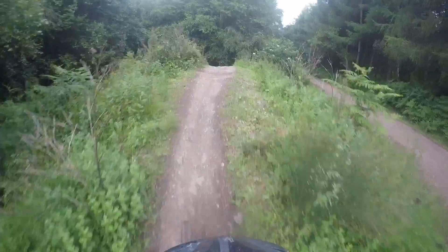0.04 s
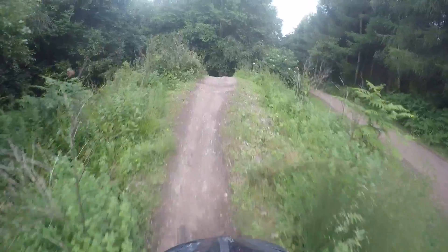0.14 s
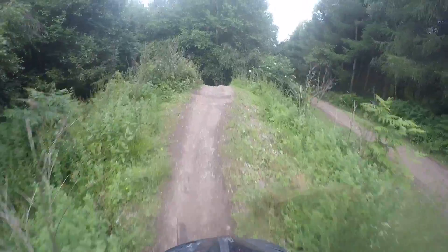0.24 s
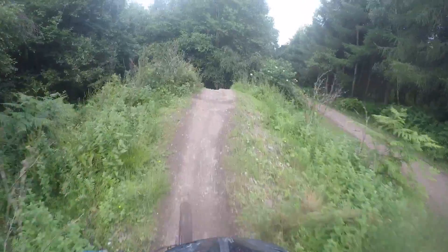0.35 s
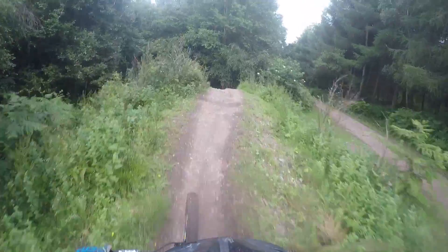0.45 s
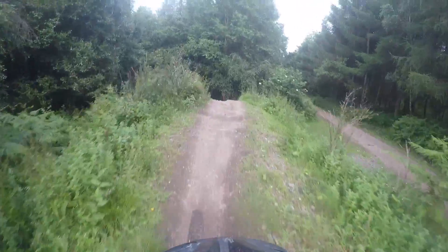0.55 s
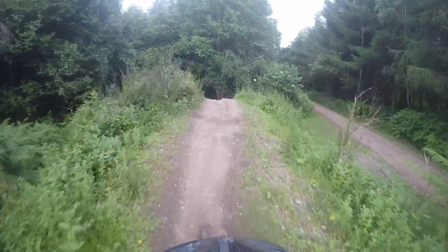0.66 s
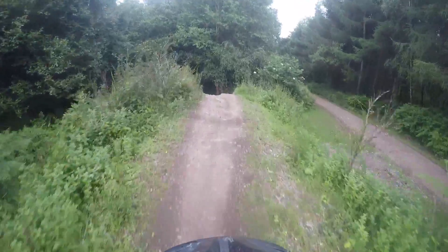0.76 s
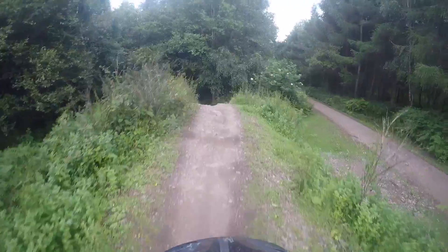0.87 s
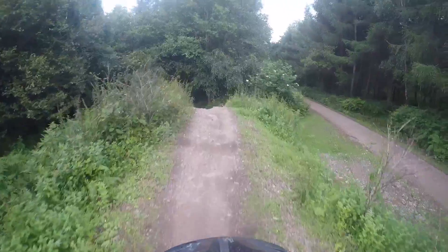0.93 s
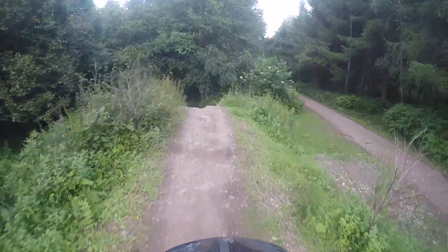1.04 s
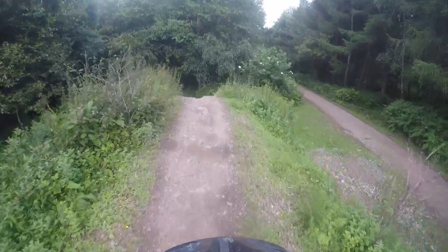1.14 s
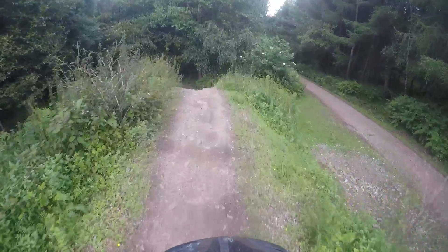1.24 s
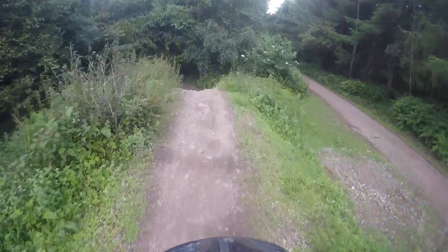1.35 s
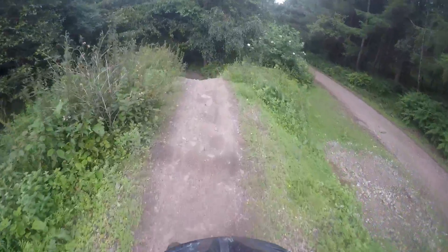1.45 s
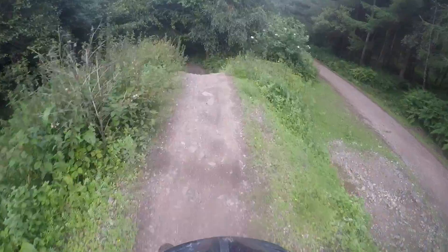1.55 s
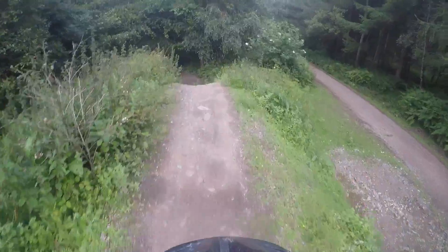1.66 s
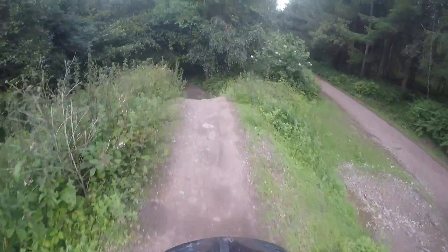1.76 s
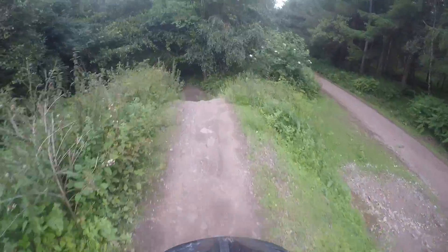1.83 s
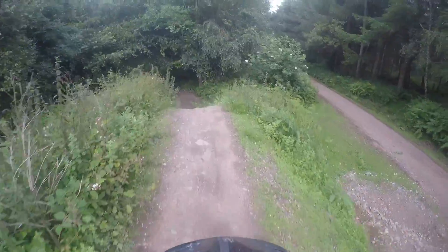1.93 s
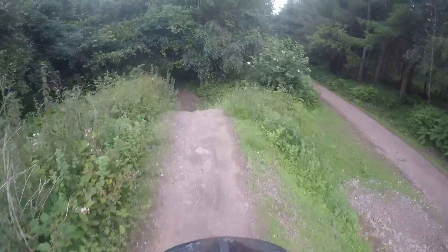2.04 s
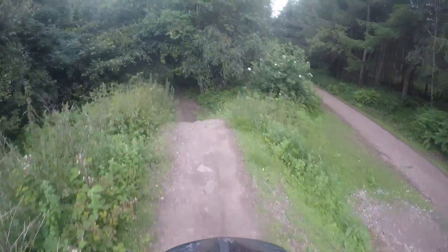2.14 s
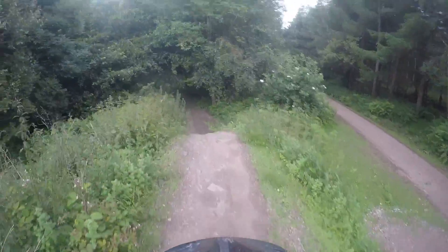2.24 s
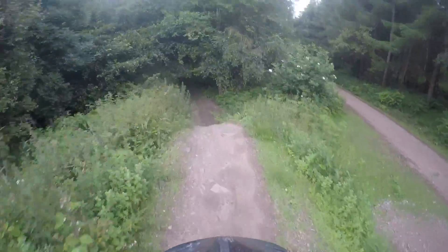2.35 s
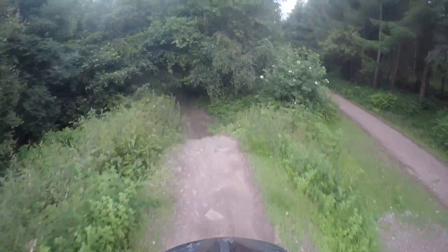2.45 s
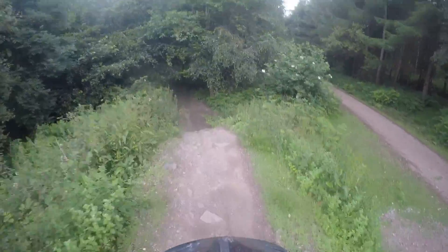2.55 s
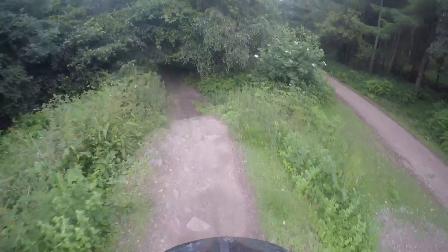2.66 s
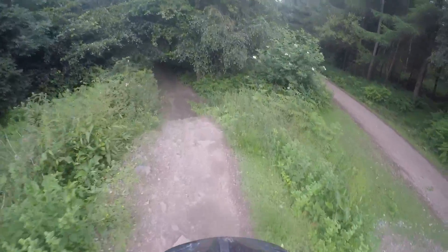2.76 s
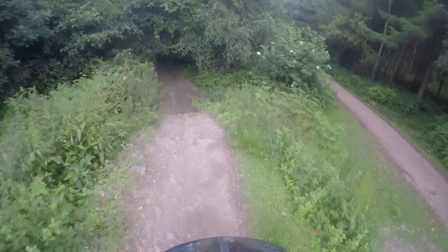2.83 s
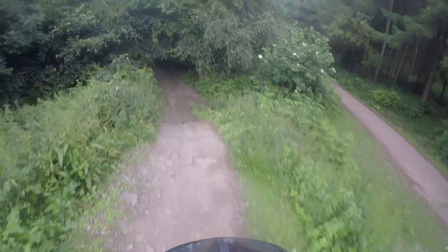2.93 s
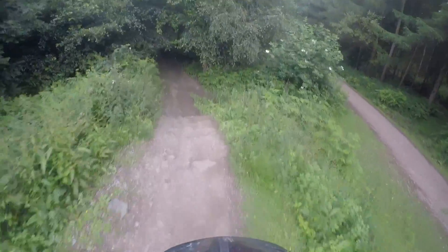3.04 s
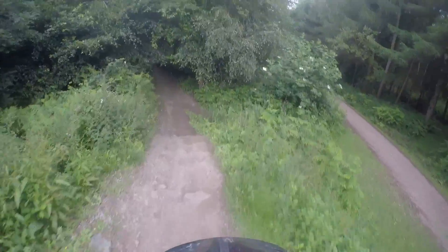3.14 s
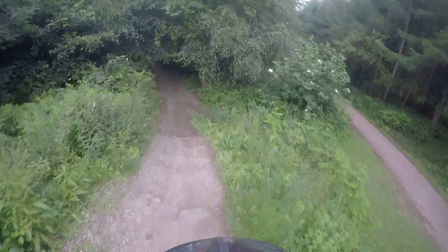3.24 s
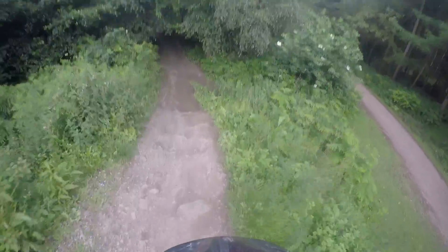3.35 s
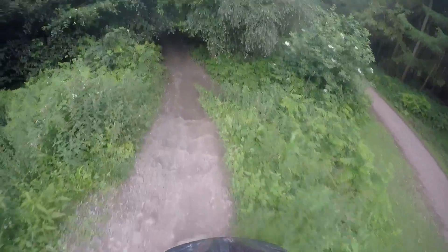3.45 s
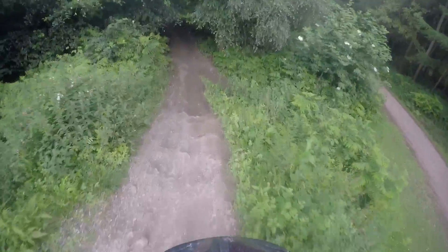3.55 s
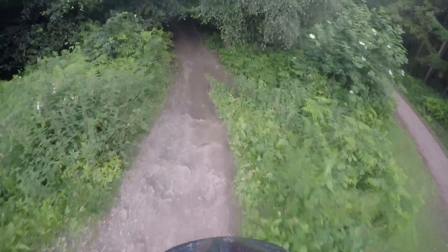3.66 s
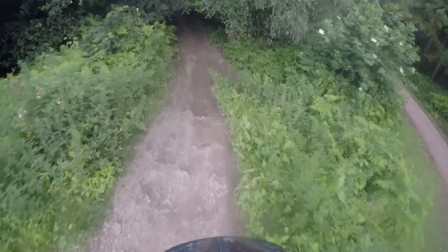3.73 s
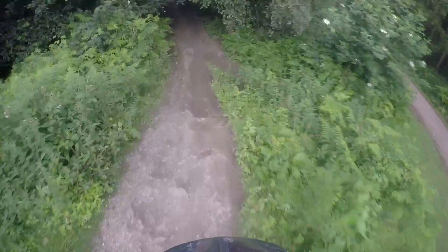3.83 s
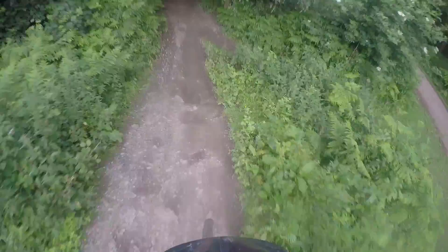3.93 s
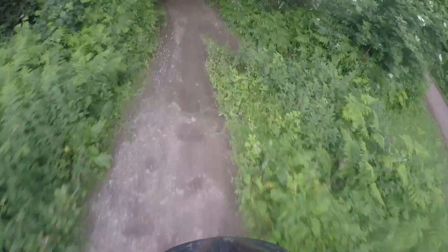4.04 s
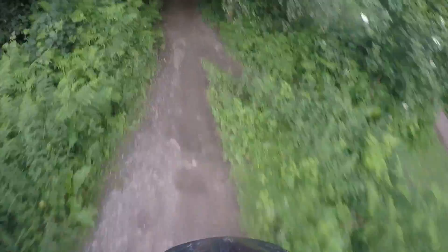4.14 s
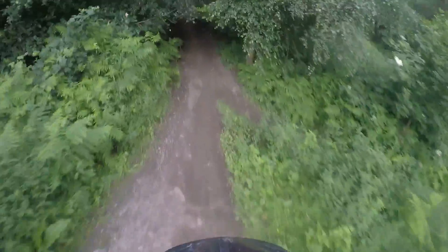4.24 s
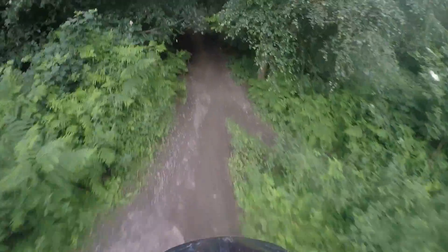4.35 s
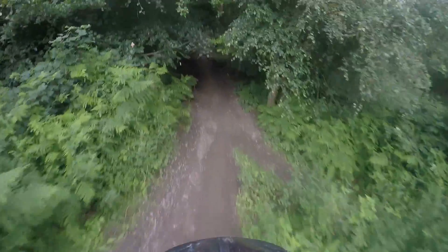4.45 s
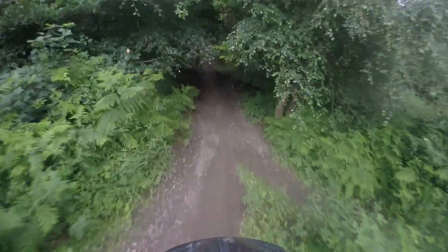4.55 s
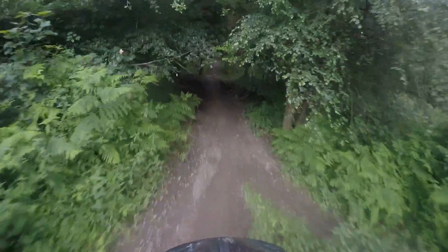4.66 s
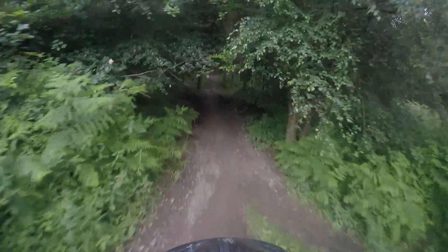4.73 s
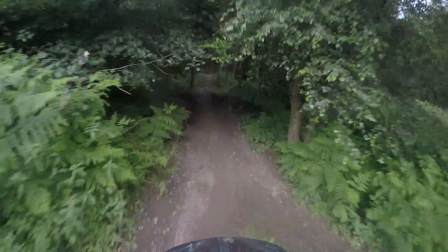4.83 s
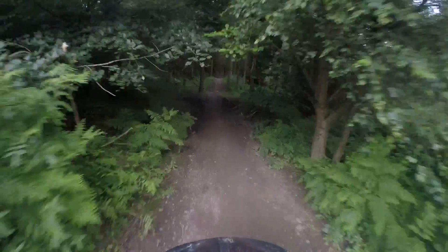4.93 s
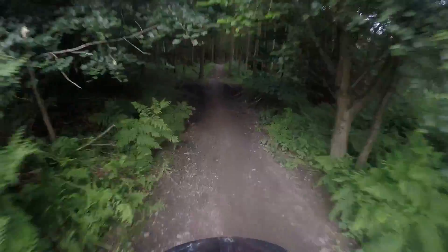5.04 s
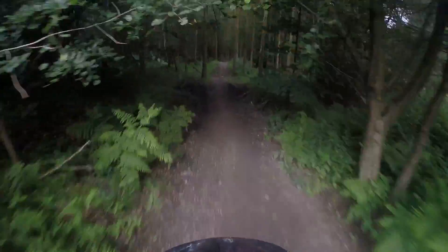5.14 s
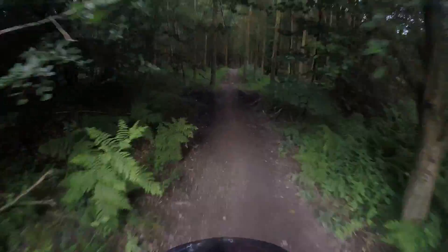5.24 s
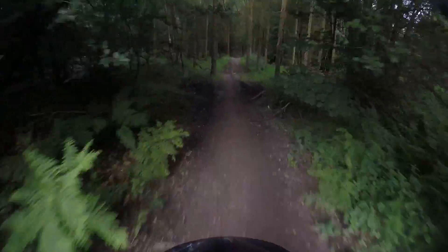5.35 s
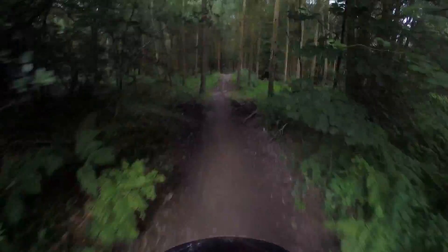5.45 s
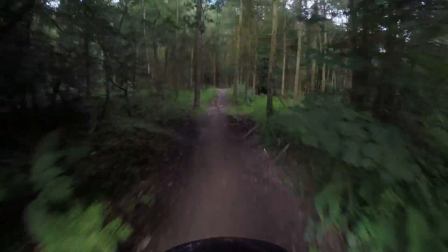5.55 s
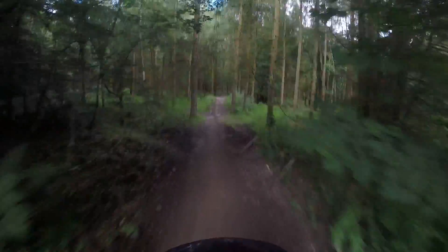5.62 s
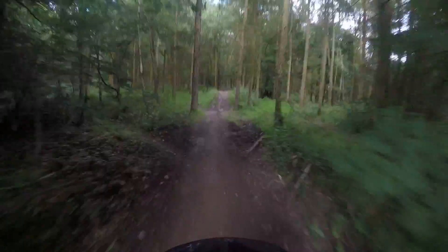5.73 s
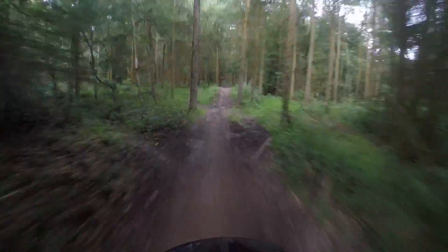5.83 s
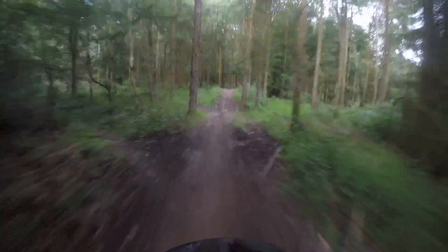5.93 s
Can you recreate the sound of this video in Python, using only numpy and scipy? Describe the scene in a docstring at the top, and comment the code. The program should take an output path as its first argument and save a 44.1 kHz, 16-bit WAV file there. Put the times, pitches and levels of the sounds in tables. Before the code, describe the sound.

A mountain bike rides a dirt trail, heard from a helmet microphone, with low, fluttering wind throughout. A gust thumps right at the start, more come around 0.6 to 0.8 seconds, and a strong one hits near 1.3 seconds along with a sharp clack. Faint cable ticks dot this opening. The wind eases around 2 seconds. From about 2.4 seconds the tyres crunch softly over patches of grit, with scattered small knocks and a stone ping. After 3.3 seconds the bike gathers speed and the buffeting builds. Between 4 and 4.9 seconds, bumps bring several low thuds and a quick run of rattling frame knocks. From 4.5 seconds a hiss of air rises around the helmet. Leaves swish past lightly near 5.3 seconds, a tick sounds near 5.8, and the wind is rumbling at its heaviest as it ends at about 6 seconds.

```python
"""A dirt trail, heard from a helmet camera: a mountain bike rolls over the crest and speeds down into a wood.
Eddies buffet the microphone and air hisses round the helmet, both louder with speed. The tyres crunch
over grit, stones and cables knock on the frame, bumps thud through the fork, and leaves swish past
at the edge of the trees."""
import sys
import numpy as np
from scipy import signal
from scipy.fft import rfft, irfft
from scipy.io import wavfile
from scipy.ndimage import uniform_filter1d

SR = 44100
rng = np.random.default_rng(int(sys.argv[2]) if len(sys.argv) > 2 else 0)


def wav_out(sig):
    """Save sig, one row per channel (or a flat mono array), as 16-bit PCM at SR to the path in sys.argv[1]."""
    wavfile.write(sys.argv[1], SR, np.round(np.clip(np.atleast_2d(sig).T, -1, 1) * 32767).astype(np.int16))


N = 264159
TIME = np.arange(N) / SR


def wind():
    """Large eddies thump the microphone, small ones flutter on top; both grow with speed, in gusts, and in the
    jolt as the bike lands."""
    # Spectra of large and small eddies. Each row: frequency in Hz, relative level in dB.
    large_spectrum = [(12, -1), (22, 2), (36, 6), (55, -1), (75, -11), (110, -26), (220, -40.5)]
    small_spectrum = [(45, -31.5), (80, 3), (110, -3.5), (165, -10.5), (210, -17), (300, -25.5),
                      (450, -38.5), (700, -43), (1500, -56), (3000, -78)]
    # Gusts, and the buffet as the bike lands. Each row: centre in seconds, length in seconds, large-eddy boost
    # in dB, small-eddy boost in dB.
    surges = [(0.02, 0.12, 12, 11), (0.58, 0.091, 3, 10.5), (0.66, 0.065, 6, 9.5), (0.75, 0.046, 10.5, 6),
              (1.2, 0.21, -0.5, 5), (1.32, 0.07, 11.5, 12), (1.41, 0.11, 7.5, 7), (2.91, 0.062, 4, 2.5),
              (3.3, 0.027, 6.5, 1), (3.87, 0.087, 13, -10), (4.63, 0.054, 6, -0.5), (4.71, 0.035, -0.5, 5.5),
              (5.92, 0.039, 10, -8)]
    large_db = by_speed(cruise_db=-29.5, doubling_db=13) + swells(surges, column=2) + walk(rate_hz=20)
    small_db = by_speed(cruise_db=-40, doubling_db=20) + swells(surges, column=3) + 1.56 * walk(rate_hz=50)
    large = turbulence(large_spectrum, span_s=0.036) * undb(large_db)
    small = turbulence(small_spectrum, span_s=0.098) * undb(small_db)
    return large + small


def turbulence(spectrum, span_s):
    """Pressure of a stream of eddies, its strength evened out over span_s."""
    pressure = colour(rng.standard_normal(N), spectrum)
    return pressure / np.sqrt(smooth(pressure ** 2, int(span_s * SR)))


def knocks(size=6000):
    """Loose parts chatter around each blow; a heavier part rings lower, a harder contact higher."""
    # Each row: time in seconds, level in dB, low cut in Hz, high cut in Hz, chatter decay in ms, part.
    blows = [(0.171, -65.5, 2300, 3000, 1.05, "cable"), (0.546, -64.5, 2600, 13000, 7.4, "cable"),
             (0.837, -52.5, 900, 15000, 8, "cable"), (0.994, -63, 2300, 3000, 1.4, "cable"),
             (1.271, -40.5, 168, 14500, 8.5, "casing"), (1.296, -49.5, 130, 1100, 18, "casing"),
             (1.297, -58, 1500, 10000, 29, "cable"), (1.304, -58, 1200, 4500, 7.2, "lever"),
             (1.441, -64.5, 1010, 4200, 2.4, "cable"), (1.519, -65, 2400, 2900, 3.7, "cable"),
             (2.305, -58, 170, 350, 5.9, "casing"), (2.378, -53, 150, 560, 4.1, "casing"),
             (2.461, -57.5, 755, 2220, 1.9, "frame"), (2.811, -51, 1200, 13000, 4.5, "stone"),
             (2.943, -55.5, 380, 900, 4, "tube"), (2.997, -70, 700, 4200, 18, "frame"),
             (3.068, -65, 1500, 4200, 14, "frame"), (3.082, -61, 380, 497, 16, "tube"),
             (3.443, -51, 684, 2200, 1.9, "frame"), (3.838, -54, 650, 3630, 16, "frame"),
             (3.975, -45.5, 700, 4500, 1.2, "lever"), (4.026, -58.5, 600, 2000, 10, "frame"),
             (4.252, -48.5, 346, 3200, 19, "frame"), (4.344, -40, 298, 3200, 0.083, "tube"),
             (4.473, -50, 750, 3000, 1.2, "frame"), (4.518, -50, 700, 2600, 2.5, "frame"),
             (4.61, -46.5, 380, 2300, 6, "frame"), (4.617, -46.5, 800, 3000, 1.4, "frame"),
             (4.667, -52, 800, 2400, 2.5, "frame"), (4.69, -50, 450, 2100, 1.1, "frame"),
             (4.729, -60, 700, 2000, 6, "frame"), (4.882, -45.5, 1200, 5000, 19, "frame"),
             (5.768, -42.5, 2820, 3700, 0.99, "frame")]
    out = np.zeros(N + size)
    lead = size // 8
    age_ms = (np.arange(size) - lead) * 1000 / SR
    for time_s, level_db, low_hz, high_hz, chatter_ms, part in blows:
        width_ms = chatter_ms * np.where(age_ms < 0, .3, 1)  # builds faster than it dies
        push = 0.11 * rng.standard_normal(size) * np.exp(-(age_ms / width_ms) ** 2)
        push[lead] += 1
        weight = signal.butter(3, low_hz, "high", fs=SR, output="sos")
        contact = signal.butter(4, high_hz, "low", fs=SR, output="sos")
        blow = signal.sosfilt(weight, ring(signal.sosfilt(contact, push), part))
        blow *= np.sqrt(.02 * SR / np.sum(blow ** 2))  # energy of 20 ms at rms 1
        start = int(time_s * SR) - lead
        out[start:start + size] += undb(level_db) * blow
    return out[:N]


def ring(push, part):
    """A part's modes answer a push; each acts twice, leaving deep valleys between them."""
    # The tube is hollow and dull, the lever clinks, the cable ticks, the stone pings.
    # Each row, per part: frequency in Hz, width in Hz, gain in dB.
    modes = { "frame": [(330, 140, 1), (459, 65, 6), (660, 130, 3), (950, 190, 3), (1400, 330, -2),
             (1700, 300, -4), (1980, 260, -2), (2440, 260, -1), (2680, 260, -1), (3600, 700, -6),
             (4300, 1200, -15), (7700, 7000, -27)], "tube": [(445, 60, 0), (545, 170, -7), (655, 100, -13),
             (1290, 160, -27), (2430, 110, -19), (2650, 190, -22)], "lever": [(940, 240, -3),
             (1300, 300, -8), (2350, 330, 0), (2910, 220, -16), (4200, 600, -28)],
             "cable": [(1060, 190, -2), (1650, 600, -8), (2320, 200, 0), (2720, 300, 0), (3550, 600, -6),
             (4900, 1000, -12), (6600, 1400, -13), (8600, 3000, -17), (14000, 3500, -22)],
             "stone": [(1550, 500, -14), (2400, 300, -11), (3520, 300, 0), (3950, 330, 0), (4380, 500, -5),
             (7500, 1500, -24), (9850, 2000, -28)], "casing": [(210, 50, 11), (375, 90, 6), (750, 100, -5),
             (935, 115, 4.5), (1260, 240, -6), (1755, 330, -11), (2410, 240, -6), (3850, 900, -14.5),
             (5450, 500, -22), (7700, 1800, -23), (12000, 6000, -33)]}
    return sum(undb(db) * resonate(resonate(push, hz, width_hz), hz, width_hz)
               for hz, width_hz, db in modes[part])


def thuds(pitch_hz=179.3, rise_s=0.0096):
    """Bumps come up through the fork as low thuds that swell and die within a few cycles."""
    # Each row: start in seconds, peak level in dB.
    bumps = [(3.981, -39), (4.248, -34), (4.296, -39), (4.343, -38), (4.467, -33.5), (4.695, -28)]
    out = np.zeros(N)
    for start_s, peak_db in bumps:
        age_s = np.maximum(TIME - start_s, 0)
        envelope = age_s / rise_s * np.exp(1 - age_s / rise_s)
        out += undb(peak_db) * envelope * np.sin(2 * np.pi * pitch_hz * age_s)
    return out


def helmet_rush():
    """Air tears off the helmet's edges and hisses in its vents, with a slight flutter."""
    # Each row: frequency in Hz, relative level in dB.
    spectrum = [(400, -2.5), (740, -11.5), (1100, -16), (1700, -10.5), (2200, 0.5), (2600, 1), (3100, 0),
                (3600, 0.5), (3850, 0.5), (4250, -10), (4850, -18.5), (5400, -15.5), (6000, -25),
                (7400, -24), (8500, -33), (15000, -45.5)]
    # Each row: time in seconds, level in dB.
    levels = [(0, -72), (4.25, -73.5), (4.43, -62), (4.52, -52.5), (4.59, -50.5), (4.64, -52),
              (4.73, -51.5), (4.8, -56), (4.935, -53.5), (4.97, -47), (5.1, -46), (5.2, -47.5), (5.48, -48),
              (5.65, -46), (5.69, -41.5), (5.82, -44), (5.99, -42.5)]
    return colour(rng.standard_normal(N), spectrum) * undb(curve(levels) + walk(rate_hz=110))


def tyres():
    """Knobs crush grit in dense grains over a soft scrub; loose pebbles set the frame ticking."""
    # Each row: frequency in Hz, relative level in dB.
    spectrum = [(150, 15), (330, 2), (450, -10), (560, -2.5), (760, -11), (1000, -7), (1250, -8),
                (1700, -5), (2200, -6.5), (2650, 2.5), (3100, -11.5), (3700, -4.5), (4500, -14),
                (8000, -38)]
    # Each row: centre in seconds, length in seconds, boost in dB.
    grit_patches = [(2.405, 0.052, 6), (2.49, 0.11, 7), (2.63, 0.092, 6), (2.88, 0.037, 7),
                    (3.0, 0.046, 11), (3.08, 0.082, 8.5), (3.17, 0.046, 6.5), (3.31, 0.046, 4.5),
                    (3.40, 0.044, 5.5), (3.48, 0.069, 5), (3.77, 0.044, 6.5), (3.86, 0.059, 7.5),
                    (4.04, 0.031, -1), (4.19, 0.021, 7), (4.27, 0.082, 4), (4.42, 0.032, 14),
                    (4.6, 0.013, 17.5)]
    grit = grains(per_s=700, spread_db=-2) + undb(-1) * rng.standard_normal(N)
    pebbles = unit(ring(grains(per_s=110, spread_db=3), "frame"))
    level_db = by_speed(cruise_db=-62.5, doubling_db=4.5) + swells(grit_patches) + 1.7 * walk(rate_hz=70)
    return (colour(grit, spectrum) + undb(-10) * pebbles) * undb(level_db)


def leaves():
    """Foliage swishes by as a dense patter of leaf edges."""
    # Each row: frequency in Hz, relative level in dB.
    spectrum = [(2500, -10), (4800, 6), (7500, 1), (10000, -8), (14000, -26)]
    # Each row: time in seconds, level in dB.
    levels = [(5.2, -85), (5.27, -60.5), (5.33, -60), (5.43, -66), (5.55, -81)]
    patter = colour(grains(per_s=2400, spread_db=1), spectrum)
    passing = (TIME > levels[0][0]) & (TIME < levels[-1][0])
    return patter * undb(curve(levels)) * passing


def hiss(level_db=-66.5):
    """A faint, even hiss."""
    # Each row: frequency in Hz, relative level in dB.
    spectrum = [(300, 0), (1000, 7.5), (2200, -0.5), (2650, 3), (3100, -2.5), (4500, -0.5), (7000, -4.5),
                (10000, -7), (15000, -10.5)]
    return colour(rng.standard_normal(N), spectrum) * undb(level_db)


def camera_case(x):
    """The case's resonances lend rushing sounds a hollow tone."""
    # Each row: frequency in Hz, width in Hz, gain in dB.
    modes = [(449.4, 53, 4.5), (736, 86, 3), (983, 190, -1), (1315, 100, -2)]
    return x + sum(undb(db) * resonate(x, hz, width_hz) for hz, width_hz, db in modes)


def by_speed(cruise_db, doubling_db, cruise_m_s=5):
    """Level in dB: cruise_db at cruising speed, plus doubling_db per doubling of speed."""
    # Slow over the crest, then down the far side. Each row: time in seconds, speed in m/s.
    speeds = [(0, 2.69), (1.1, 2.89), (1.65, 2.37), (2.1, 2.53), (2.4, 3), (3.17, 3.1), (3.28, 4.66),
              (3.75, 4.32), (4.0, 5.97), (4.2, 5.23), (4.5, 6.28), (4.7, 7.4), (5.45, 8.38), (5.7, 8.7),
              (5.95, 9.3)]
    return cruise_db + doubling_db * np.log2(curve(speeds) / cruise_m_s)


def swells(events, column=2):
    """Boost in dB from passing events, each a bell curve in time."""
    return sum(row[column] * np.exp(-(2 * (TIME - row[0]) / row[1]) ** 2) for row in events)


def grains(per_s, spread_db):
    """Random clicks, rms 1; a few stand out if spread_db is positive, or sink if it is negative."""
    hit = rng.random(N) < per_s / SR
    size = undb(spread_db * np.minimum(rng.exponential(size=N), 4))
    return unit(hit * size * np.sign(rng.standard_normal(N)))


def walk(rate_hz):
    """Smoothed random steps, rms 1."""
    hold = max(int(SR / rate_hz), 1)
    steps = np.repeat(rng.standard_normal(N // hold + 1), hold)
    return unit(smooth(steps, hold)[:N])


def colour(x, spectrum):
    """Shape x by (Hz, dB) points, falling 12 dB per octave past the ends; rms 1."""
    hz, db = np.transpose(spectrum)
    bins_hz = np.maximum(np.arange(N // 2 + 1) * SR / N, 1)
    gain = undb(np.interp(np.log(bins_hz), np.log(hz), db))
    skirts = np.minimum(bins_hz / hz[0], 1) ** 2 * np.minimum(hz[-1] / bins_hz, 1) ** 2
    return unit(irfft(rfft(x) * gain * skirts, N))


def resonate(x, hz, width_hz):
    """One resonance, gain 1 at its centre."""
    return signal.lfilter(*signal.iirpeak(hz, hz / width_hz, fs=SR), x)


def curve(points):
    """(Seconds, value) points joined by straight lines."""
    return np.interp(TIME, *np.transpose(points))


def smooth(x, samples):
    """Moving average, applied twice."""
    return uniform_filter1d(uniform_filter1d(x, samples), samples)


def undb(db):
    """Decibels to gain."""
    return 10 ** (np.asarray(db) / 20)


def unit(x):
    """Scale to rms 1."""
    return x / np.sqrt(np.mean(x ** 2))


def scene():
    """All sources meet at one microphone; the case colours the air and tyre noise."""
    mix = hiss() + camera_case(wind() + helmet_rush() + tyres()) + leaves() + knocks() + thuds()
    return mix[None]


def record(dry, top_hz=15300, fade_s=.004):
    """The camera cuts the top; a short fade ends the sound without a click."""
    fade = np.minimum((TIME[-1] - TIME) / fade_s, 1)
    lowpass = signal.ellip(10, .2, 70, top_hz, fs=SR, output="sos")
    return signal.sosfilt(lowpass, dry * fade)


dry = scene()
out = record(dry)
wav_out(out)
```